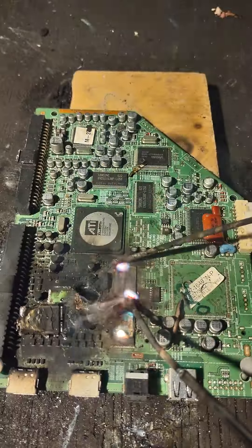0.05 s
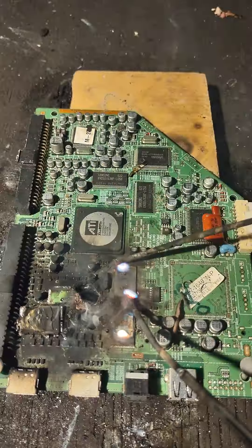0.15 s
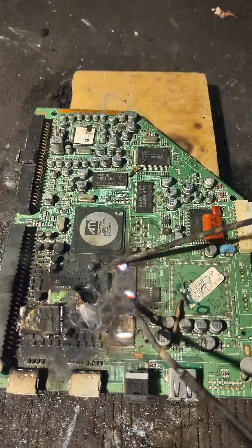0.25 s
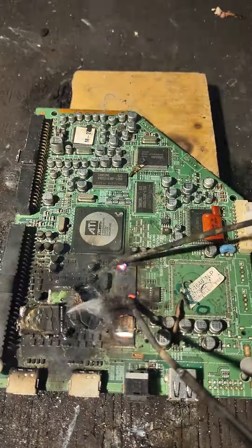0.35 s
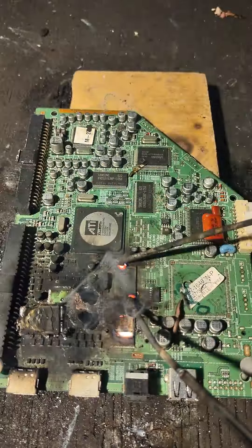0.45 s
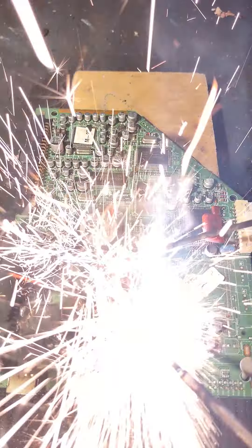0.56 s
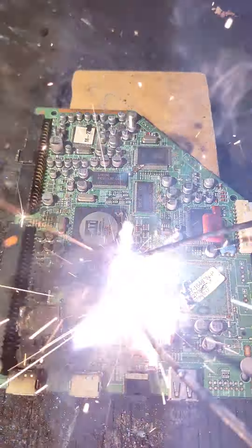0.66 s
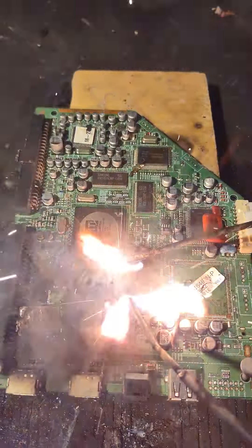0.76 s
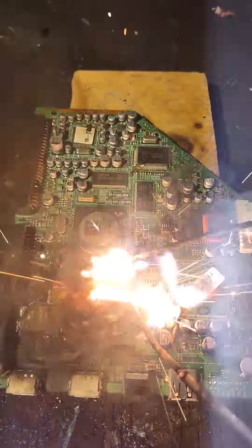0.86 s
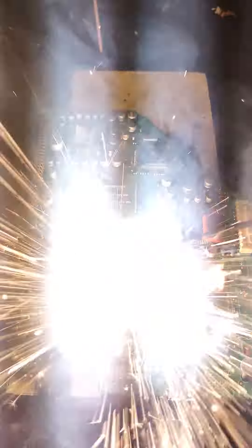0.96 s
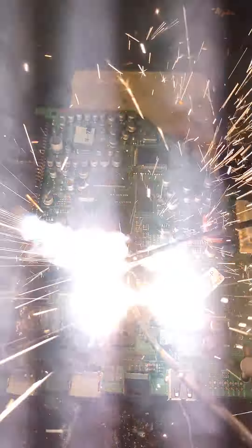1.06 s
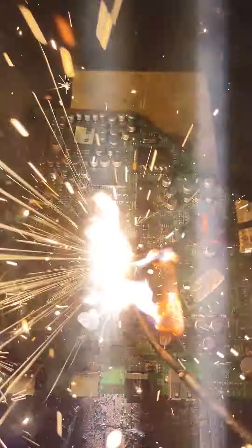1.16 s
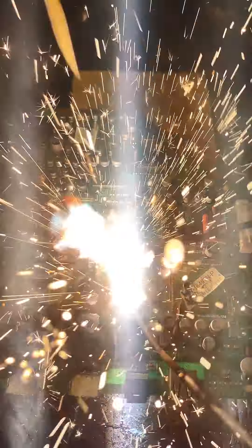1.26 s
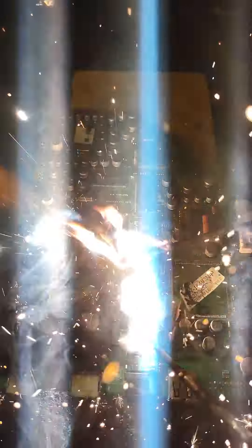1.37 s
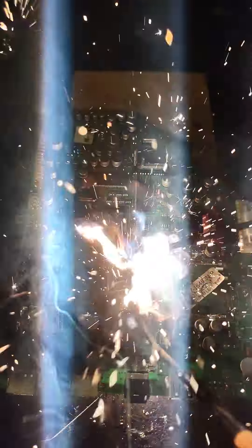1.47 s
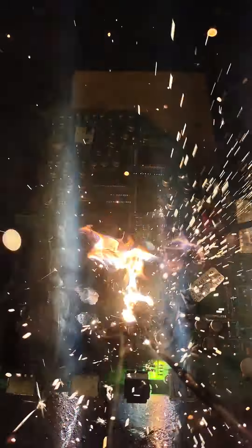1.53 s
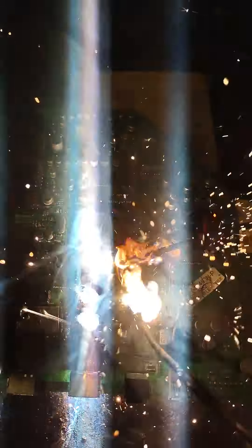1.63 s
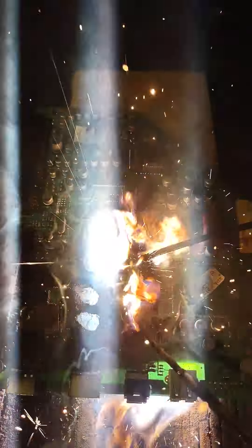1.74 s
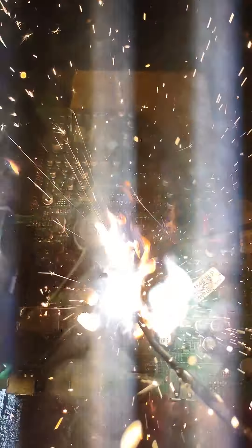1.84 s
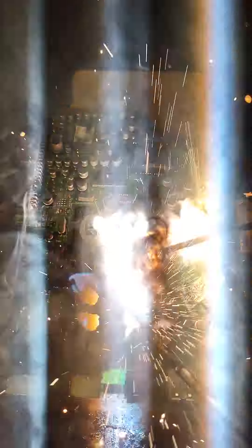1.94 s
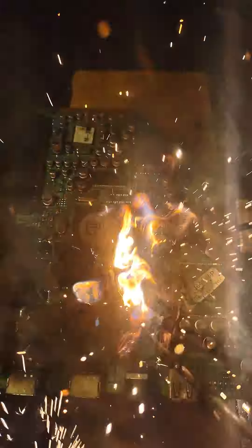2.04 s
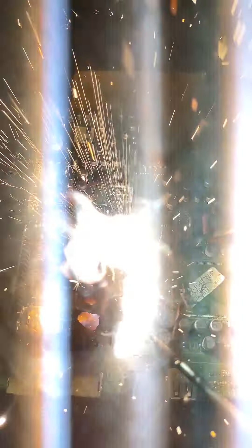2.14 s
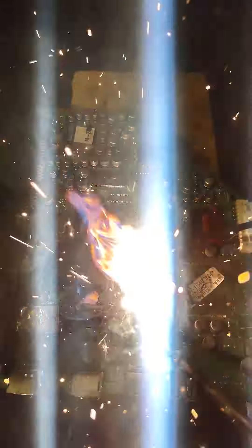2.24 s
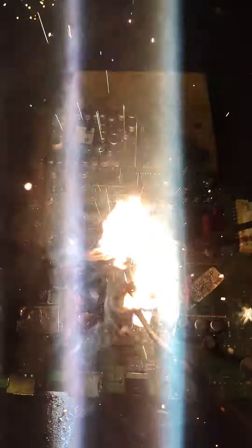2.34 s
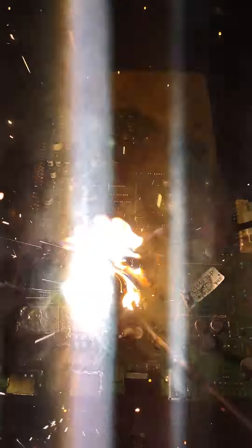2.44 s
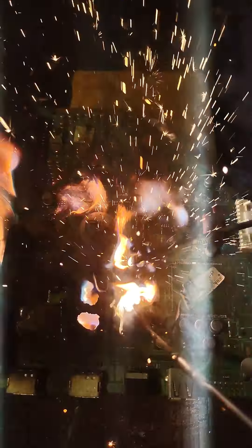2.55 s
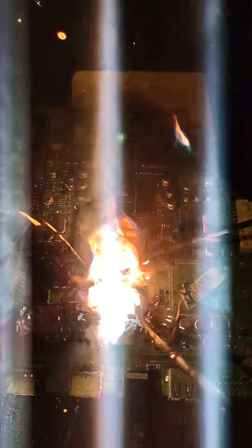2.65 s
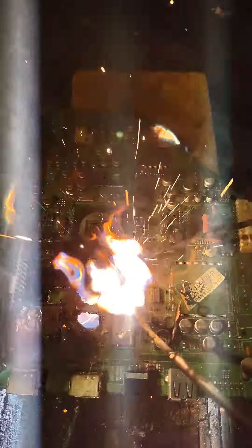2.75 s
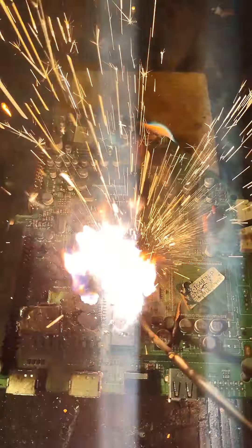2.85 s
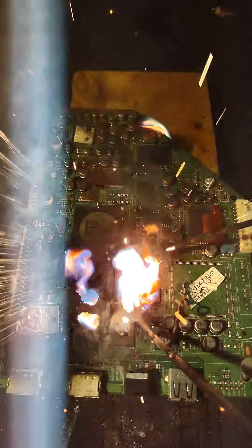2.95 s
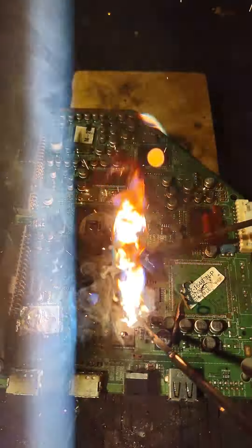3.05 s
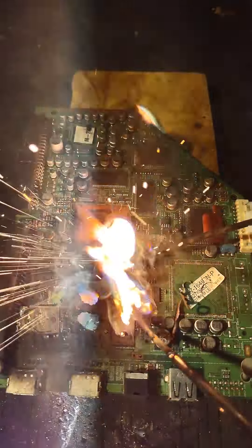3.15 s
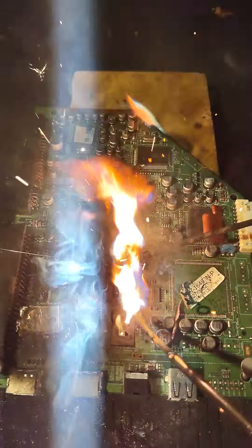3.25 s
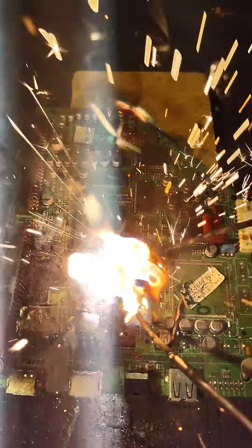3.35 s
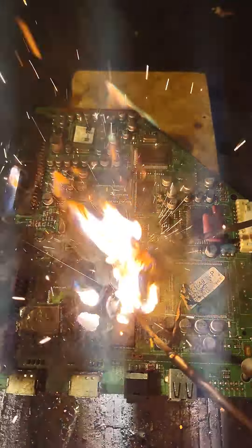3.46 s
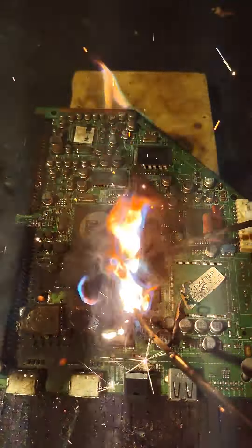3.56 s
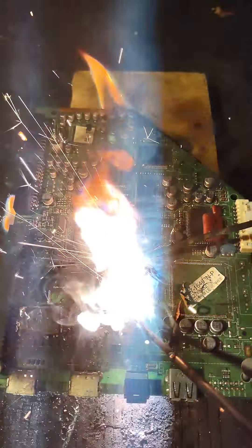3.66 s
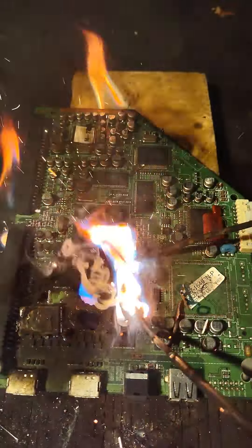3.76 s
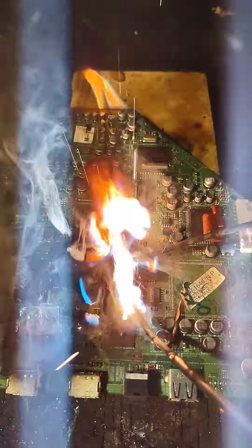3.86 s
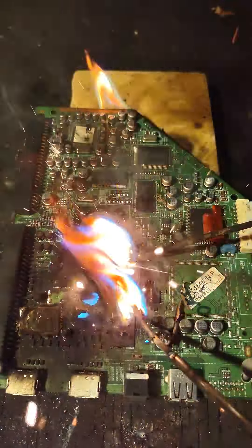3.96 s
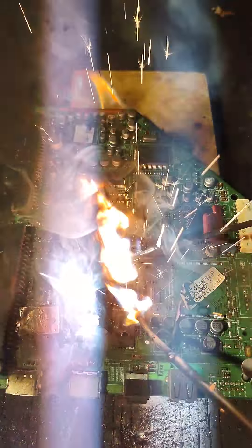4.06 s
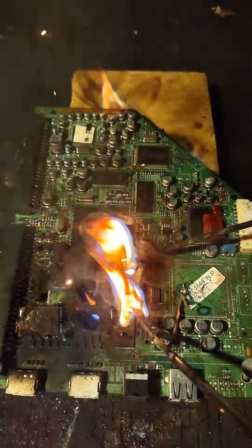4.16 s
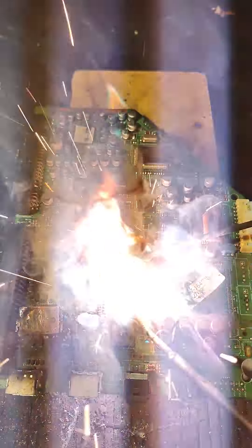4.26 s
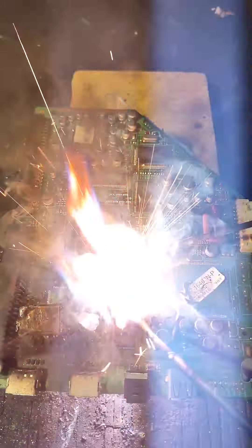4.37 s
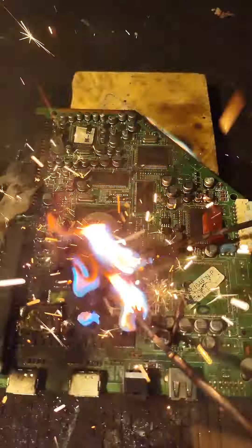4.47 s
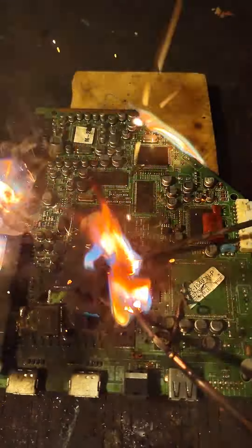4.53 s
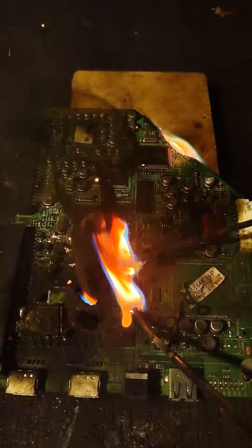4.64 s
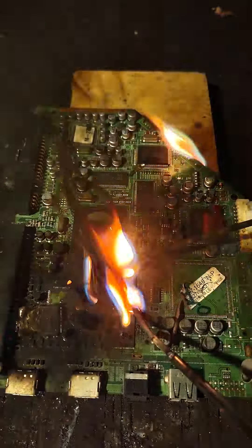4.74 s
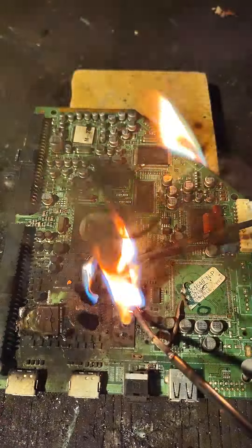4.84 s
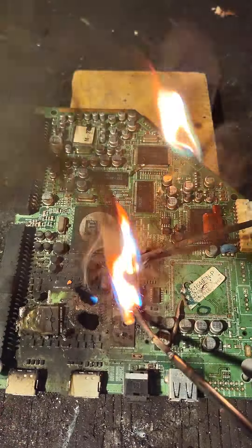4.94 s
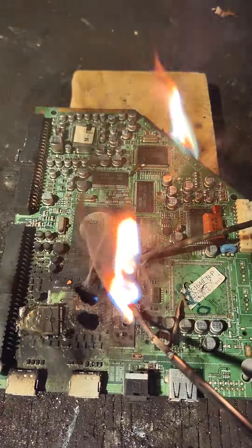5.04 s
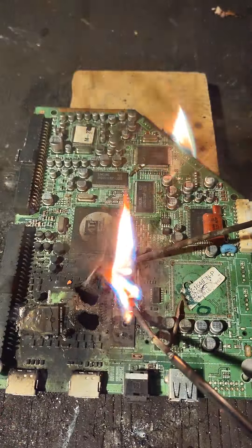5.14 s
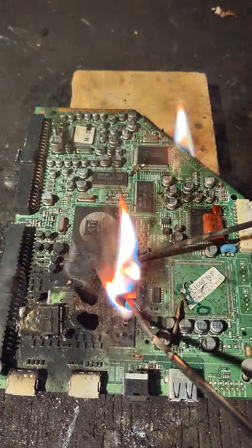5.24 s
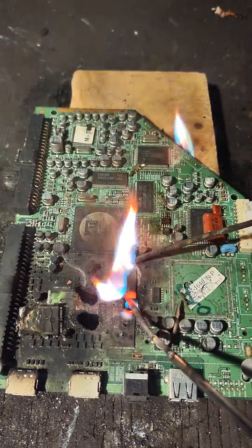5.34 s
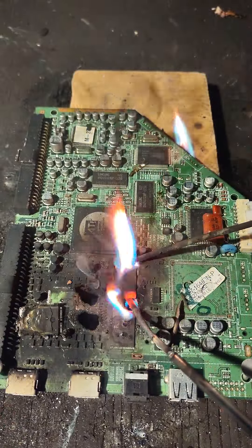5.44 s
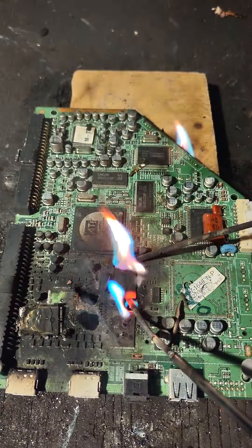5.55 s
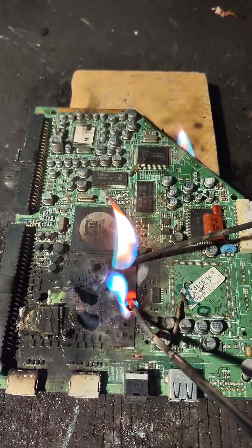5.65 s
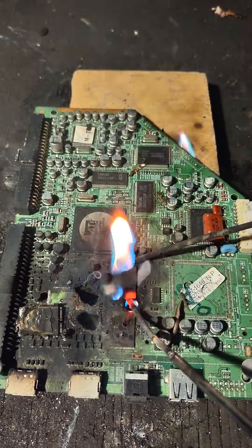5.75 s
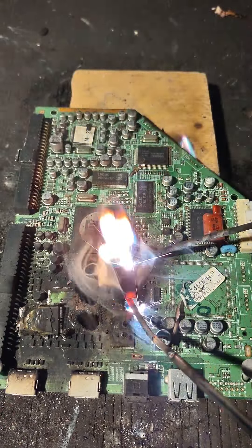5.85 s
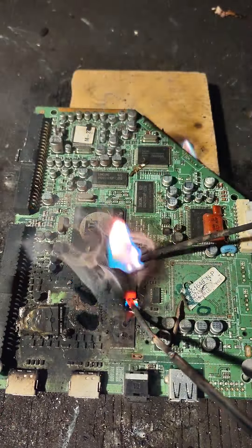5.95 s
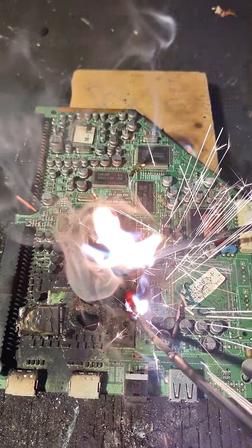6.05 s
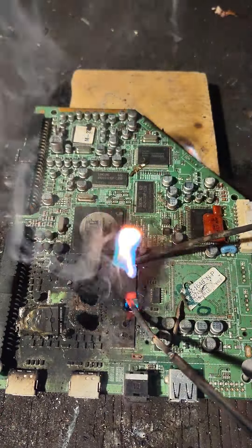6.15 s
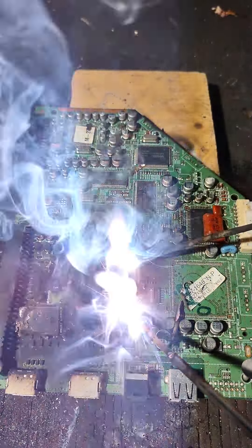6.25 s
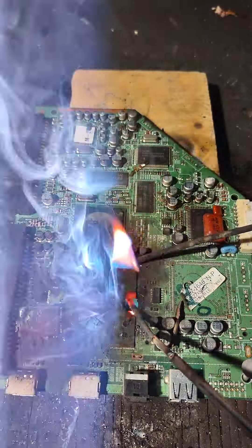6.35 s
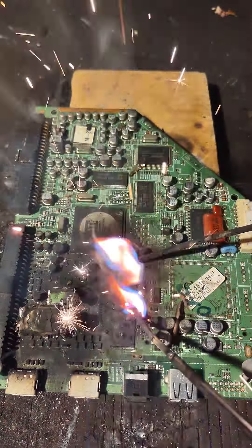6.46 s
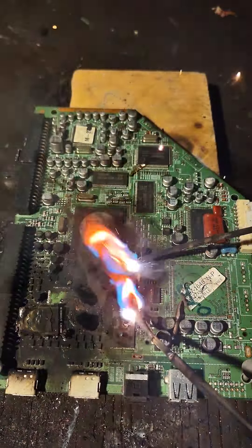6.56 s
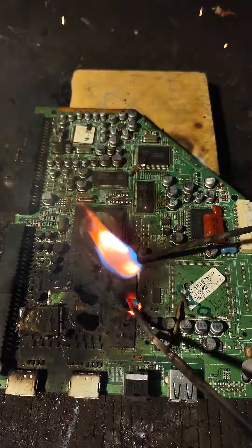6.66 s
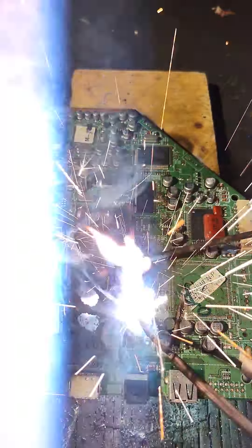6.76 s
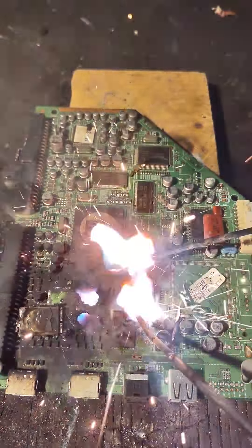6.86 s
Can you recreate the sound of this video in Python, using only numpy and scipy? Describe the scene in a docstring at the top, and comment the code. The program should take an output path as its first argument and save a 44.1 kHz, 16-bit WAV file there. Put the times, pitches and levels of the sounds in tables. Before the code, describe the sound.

Close, sharp electrical pops and sizzling crackle over a low hum, followed by a lull and a few more snaps.

```python
"""Arc on a burning circuit board

A mains-fed arc jumps between two probes, close to the microphone in a workshop. It can strike once
in every half wave: each strike is a pressure pop and a burst of spatter. The plasma hums at twice
the mains frequency, molten bits sizzle, the hot board ticks, the room answers and rumbles faintly."""
import sys
import numpy as np
from scipy import signal
from scipy.fft import rfft, irfft, next_fast_len
from scipy.io import wavfile
from scipy.ndimage import uniform_filter1d, map_coordinates

SR = 44100
rng = np.random.default_rng(int(sys.argv[2]) if len(sys.argv) > 2 else 0)


def file_out(sig):
    """Save sig as 16-bit WAV at sys.argv[1]."""
    # one column per channel
    cols = np.atleast_2d(sig).T
    # limit, then scale
    lim = np.clip(cols, -1, 1)
    pcm = np.round(lim * 32767).astype(np.int16)
    wavfile.write(sys.argv[1], SR, pcm)


N = 304290
TIME = np.arange(N) / SR
MAINS_HZ, FIRST_CREST_S = 59.96, .0055

# Accents, the big hits and re-ignitions: t/s, spatter level/dB, pop level/dB
ACCENTS = [(0.1, -31.5, -26.5), (0.1414, -29.5, -17), (0.631, -12, -9), (0.656, -11, -10.5),
           (0.6735, -11.5, -6), (0.7387, -16, -12.5), (0.7573, -13.5, -8.5), (0.822, -15.5, -10.5),
           (0.9085, -20.5, -9), (0.9163, -14.5, -9.5), (0.9587, -22, -7.5), (1.006, -16.5, -11.5),
           (1.0148, -13, -23), (1.0577, -26, -13.5), (1.074, -11, -5.5), (1.0897, -9, -17.5),
           (1.105, -12, -9.5), (1.198, -16.5, -16), (1.2419, -11.5, -7.5), (1.2586, -12.5, -8),
           (1.2915, -14.5, -7.5), (1.3143, -14, -6.5), (1.326, -7.5, -13.5), (1.3483, -9, -7),
           (1.3649, -11, -9.5), (1.3808, -9, -16.5), (1.423, -8.5, -11.5), (1.4967, -17.5, -14),
           (1.5578, -10.5, -5.5), (1.618, -9.5, -18.5), (1.6991, -11.5, -8.5), (1.7225, -10, -6),
           (1.766, -11.5, -7), (1.783, -8.5, -9.5), (1.873, -13, -7), (1.932, -15, -9), (1.9829, -16, -9),
           (2.009, -22, -12), (2.033, -15, -9), (2.0515, -13, -13), (2.109, -15.5, -13.5),
           (2.158, -11.5, -13), (2.1922, -13, -8.5), (2.2405, -11, -12), (2.274, -14.5, -10.5),
           (2.2989, -11.5, -7.5), (2.358, -22.5, -8.5), (2.4489, -13, -6.5), (2.4825, -14.5, -14),
           (2.5168, -26.5, -9), (2.5509, -11.5, -6), (2.6063, -8.5, -7.5), (2.6573, -15, -17),
           (2.7171, -17, -17.5), (2.7655, -12, -11), (2.8327, -14.5, -9), (2.8836, -17.5, -12.5),
           (2.9099, -19, -10.5), (2.9421, -13, -13), (2.9575, -11, -7), (3.0258, -16, -10.5),
           (3.0413, -11.5, -9.5), (3.0581, -12, -14.5), (3.083, -11, -11.5), (3.1086, -16, -8.5),
           (3.183, -16.5, -9), (3.191, -13, -10), (3.208, -12, -9.5), (3.2253, -12.5, -9.5),
           (3.2421, -11.5, -10.5), (3.284, -8.5, -6), (3.326, -14.5, -13), (3.3591, -14.5, -9),
           (3.3841, -12.5, -9.5), (3.4173, -14, -8), (3.4434, -13.5, -7.5), (3.4584, -11, -8),
           (3.492, -7.5, -10.5), (3.534, -15, -11), (3.5585, -12, -8.5), (3.5924, -14.5, -21),
           (3.6676, -27, -10.5), (3.6924, -17, -7), (3.7238, -7, -8), (3.7933, -18.5, -10),
           (3.8337, -10, -10), (3.878, -27, -16.5), (3.9507, -15.5, -4.5), (3.9674, -11, -3.5),
           (3.9753, -18.5, -8), (3.9922, -18, -6), (4.0163, -9, -10), (4.0333, -16, -12), (4.042, -24, -10),
           (4.1673, -16, -8.5), (4.175, -12.5, -7), (4.3257, -22.5, -2), (4.334, -9, -16), (4.3502, -12, 4),
           (4.3921, -16.5, -9), (4.4089, -10, -8), (4.426, -25, -10), (4.4427, -22.5, -12.5),
           (4.4842, -16.5, -10), (4.5246, -13, -10), (4.5415, -13.5, -3.5), (4.5584, -15.5, -11.5),
           (5.967, -32.5, -28), (6.1596, -17, -5), (6.167, -22.5, -15.5), (6.3853, -22.5, -6.5),
           (6.485, -21.5, -9.5), (6.4926, -11, -5), (6.5004, -16, -7.5), (6.51, -10, -10.5),
           (6.5262, -14.5, -9), (6.634, -31, -19.5), (6.6602, -31, -17), (6.843, -15, -4.5),
           (6.8591, -11, -5.5)]
# Fader moves of the burning arc: t/s, sizzle level/dB, hum level/dB, fill pop/dB, fill spatter/dB
ARC_FADERS = [(.628, -21.5, -41.5, -22.5, -18), (.9, -35.5, -31.5, -16, -26),
              (1.1, -28.5, -26.5, -18.5, -23), (1.5, -22, -31, -13.5, -16.5), (1.97, -21, -27, -16, -18.5),
              (2.5, -18.5, -37, -13, -25), (2.7, -35, -47, -16.5, -18), (3.3, -31.5, -46.5, -14, -21),
              (3.8, -40, -41, -15, -20), (4, -42.5, -34.5, -16, -19), (4.15, -46.5, -28.5, -21.5, -32.5),
              (4.33, -41, -25, -9.5, -23), (4.55, -23.5, -34, -15.5, -19), (4.7, -45, -39, -18.5, -22.5),
              (4.84, -71.5, -50.5, -20, -22), (6.14, -70.5, -50, -20, -25), (6.17, -49.5, -49.5, -23, -27),
              (6.45, -65.5, -50, -18, -21), (6.5, -33, -37, -15.5, -27), (6.7, -49, -40, -19, -20),
              (6.82, -63, -35, -21, -21), (6.845, -27.5, -43, -7, -13), (6.9, -32.5, -41.5, -21.5, -18)]
# Thin ticks of the hot board and the arc's last small sputters: t/s, level/dB
THIN_TICKS = [(0.022, -34), (0.057, -38), (4.225, -24.5), (4.293, -24), (4.648, -23.5), (4.706, -30.5),
              (4.748, -34.5), (4.769, -38), (4.803, -42), (4.831, -40.5), (4.903, -54.5), (4.959, -65.5),
              (4.979, -52.5), (5.12, -50), (5.135, -45.5), (5.144, -40.5), (5.154, -44.5), (5.298, -59),
              (5.457, -54.5), (5.518, -31.5), (5.67, -33), (5.76, -54), (5.847, -44), (6.051, -49.5),
              (6.377, -23)]
def strikes():
    """Accents, random-sized fills on the other mains crests while the arc burns, and thin ticks and sputters."""
    accent_s, spatter_db, pop_db = np.transpose(ACCENTS)
    crests = np.arange(FIRST_CREST_S, N / SR, .5 / MAINS_HZ)
    at = (crests * SR).astype(int)
    size, jitter, spread = rng.standard_normal((len(crests), 3)).T
    accented = np.abs(crests[:, None] - accent_s).min(axis=1) < .004
    free = ~accented & (burning()[at] > 0)
    spent_db = 3.5 * np.roll(accented, 1)  # an accent leaves the gap weaker for the next half wave
    size_db = np.minimum(3.5 * size, 1.5) - spent_db
    fill_pop_db, fill_spatter_db = (fader[at] + size_db for fader in faders(ARC_FADERS)[2:])
    fills = np.array([crests + .0008 * jitter, fill_spatter_db + 2.5 * spread, fill_pop_db])[:, free]
    tick_s, tick_db = np.transpose(THIN_TICKS)
    hits = np.hstack([[accent_s, spatter_db, pop_db], fills, [tick_s, tick_db - 12.5, tick_db - .5]])
    counts = [len(accent_s), free.sum(), len(tick_s)]
    return discharge(*hits, base_rise_s=np.repeat([.00021, .00022, .00005], counts),
                     base_t60=np.repeat([.032, .03, .03], counts))


# Softness of the pops, longer is duller: t/s, length/ratio
POP_STRETCH = [(0, 0.78), (.7, 1.24), (.95, 1.73), (1.3, 0.98), (3.8, 0.96), (4.3, 0.91), (6.9, 0.66)]
# Tone of spatter and sizzle: f/Hz, level/dB
SPATTER_EQ = [(710, -15), (1200, -2.5), (1440, -18.5), (1830, -2.5), (2560, -7), (2950, -2.5), (5900, -4.5),
              (9720, -14), (15200, -17), (16000, -23.5)]
def discharge(times, spatter_db, pop_db, base_rise_s, base_t60):
    """Each strike shoves the air once and throws a short, ragged spray of spatter."""
    t = np.arange(SR // 25) / SR
    length, decay, echo_strength, delay = rng.standard_normal((len(times), 4)).T
    starts = times - base_rise_s
    blunt = .0083 * (pop_db - spatter_db - 5.5)  # little spatter means a slower, duller shove
    rise_s = base_rise_s * np.interp(times, *np.transpose(POP_STRETCH)) * np.exp(blunt + .14 * length)
    age = t[:120] / rise_s[:, None]
    shove = amp(pop_db)[:, None] * (age * np.exp(1 - age)) ** 2
    echo_s = times + .001301 * np.exp(.098 * delay)  # an inverted echo of each pop, about 1.3 ms later
    pops = place(starts, shove) + place(echo_s, (.3 * echo_strength[:, None] - .75) * shove)
    t60 = (base_t60 * np.exp(.46 * decay))[:, None]
    spray_power = (1 - np.exp(-t / .00062)) ** 2 * amp(2 * spatter_db[:, None] - 120 * t / t60)
    spray = np.sqrt(place(starts, spray_power)) * amp(.89 * wobble(700))
    return amp(1) * filtered(pops, air_pocket) + amp(3.5) * spray * hiss(SPATTER_EQ)


# Body of the pops: f/Hz, bandwidth/Hz, left level/dB, right level/dB
POCKET_MODES = [(161.4, 102, 2.5, 4), (241.6, 42, -0.5, -0.5), (499, 209, -7.5, 5), (947, 1140, 1, 3.5),
                (2049, 645, 7, 3), (3600, 770, -15.5, -25)]
def air_pocket(hz):
    """Response of the air ringing between board, bench and microphone; the left port is nearer."""
    ring = sum(amp([[left], [right]]) * 1j * hz * width / (f * f - hz * hz + 1j * hz * width)
               for f, width, left, right in POCKET_MODES)
    left_lead_s = .00007
    return ring * np.exp(2j * np.pi * hz * np.array([[.5], [-.5]]) * left_lead_s)


# Gaps in the burn: start t/s, end t/s
ARC_GAPS = [(0, .63), (.685, .738), (.785, .82), (.85, .905), (.935, .955), (.98, 1.004), (1.025, 1.055),
            (1.168, 1.18), (1.295, 1.306), (1.402, 1.42), (1.468, 1.488), (1.68, 1.696), (1.99, 2.03),
            (2.088, 2.105), (2.165, 2.18), (2.22, 2.23), (2.505, 2.53), (2.64, 2.654), (2.725, 2.764),
            (2.805, 2.83), (2.985, 3.022), (3.062, 3.106), (3.14, 3.182), (3.255, 3.28), (3.33, 3.38),
            (3.395, 3.44), (3.465, 3.48), (3.505, 3.555), (3.625, 3.666), (3.705, 3.722), (3.812, 3.83),
            (3.85, 3.948), (3.98, 3.99), (4.05, 4.165), (4.198, 4.315), (4.465, 4.475), (4.5, 4.522),
            (4.565, 6.48), (6.535, 6.84)]
def burning():
    """1 while the arc burns, 0 while it is out."""
    return 1 - sum((TIME > start) & (TIME < end) for start, end in ARC_GAPS)


# Partials of the hum: multiple of twice the mains frequency, level/dB
HUM_PARTIALS = [(1, 2), (2, -5), (4, -4), (5, -15)]
def plasma():
    """The hot column swells with each half wave; molten bits sizzle, less when the arc is out."""
    sizzle_db, hum_db = faders(ARC_FADERS)[:2]
    heat = uniform_filter1d(burning() * 1.0, size=500)
    phase = 4 * np.pi * MAINS_HZ * (TIME - FIRST_CREST_S)
    # the hum lags the strikes by about 4 ms, keeping its low note full
    lagged = phase - 4 * np.pi * MAINS_HZ * .0042
    hum = sum(amp(db + 2.5 * wobble(40)) * np.cos(k * lagged + .3 * wobble(30)) for k, db in HUM_PARTIALS)
    spits_db = 4.9 * wobble(60) + 2.1 * wobble(500) + 2.8 * np.cos(phase - 1.2)
    sizzle = amp(sizzle_db - 4.3 * (1.5 - heat) + spits_db) * hiss(SPATTER_EQ)
    return amp(hum_db) * heat * hum + sizzle


# Reverb time of the room: f/Hz, t60/s
ROOM_DECAY = [(100, 0.3), (400, 0.63), (1500, .55), (3500, 0.27), (14000, 0.16)]
def workshop(x):
    """A short room reverb in which each frequency dies at its own speed."""
    hz, t, noise = signal.stft(rng.standard_normal((2, SR // 2)), SR, nperseg=256)
    tail = signal.istft(noise * amp(-60 * t / along(ROOM_DECAY, hz)[:, None]), SR, nperseg=256)[1]
    predelayed = np.pad(x.mean(axis=0), (200, 0))[None]
    reverb = signal.fftconvolve(predelayed, tail / np.linalg.norm(tail[0]), axes=1)[:, :N]
    return_eq = [(70, 1), (120, 3.5), (250, -3), (480, -4), (1000, -9), (2000, -4), (10000, 5)]
    return stereo_pair(reverb, return_eq)


# Fader moves of the bed: t/s, rumble level/dB, air level/dB
BED_FADERS = [(0, -48.5, -58.5), (.25, -55, -59.5), (.45, -45.5, -58.5), (.6, -55, -63), (.64, -40.5, -57),
              (4.7, -44.5, -50), (4.85, -60, -69), (5.3, -62.5, -71.5), (5.92, -71.5, -77), (6.1, -71, -66),
              (6.9, -63.5, -67.5)]
# Tone of the rumble: f/Hz, level/dB
RUMBLE_EQ = [(18, -41), (30, -13.5), (81, 3), (140, -2), (231, -1.5), (289, -10.5), (700, -28), (910, -54),
             (1540, -120)]
# Tone of the airy hiss: f/Hz, level/dB
AIR_EQ = [(240, -30.5), (400, -2.5), (1000, -2.5), (2200, -10.5), (2800, -18), (6500, -26.5),
          (12000, -26.5), (15500, -28.5)]
# Low swell before the arc catches: t/s, level/dB
DRONE_FADER = [(.3, -75), (.33, -47), (.48, -56), (.53, -80)]
def room_tone():
    """A low, lumpy rumble of flame and room, a faint airy hiss and a short drone."""
    rumble_db, air_db = faders(BED_FADERS)
    drone_hz = 155
    drone = amp(faders(DRONE_FADER)[0] + 1.5 * wobble(30)) * np.sin(2 * np.pi * drone_hz * TIME)
    rumble = amp(rumble_db + .67 * wobble(25)) * hiss(RUMBLE_EQ)
    air = amp(air_db + 1.05 * wobble(55)) * hiss(AIR_EQ)
    return rumble + air + drone


# Pan of the noise layers: f/Hz, left minus right level/dB
NOISE_PAN = [(600, 0.5), (2000, -1), (5000, -3), (8000, -7), (14000, 2.5)]
def hiss(eq):
    """Coloured stereo noise of rms 1."""
    pair = stereo_pair(rng.standard_normal((2, N)), eq)
    panned = filtered(pair, lambda hz: amp(along(NOISE_PAN, hz) * [[.5], [-.5]]))
    return panned / np.sqrt(np.mean(panned ** 2) + 1e-20)


# Stereo image, mono in the bass and wide on top: f/Hz, left-right correlation
CORRELATION = [(100, 1), (500, 0.61), (1500, 0.35), (4000, 0.068), (12000, 0.012)]
def stereo_pair(x, eq):
    """Colours two unrelated signals and blends them as two close microphone ports hear them."""
    def mid_side(hz):
        angle = np.arccos(np.clip(along(CORRELATION, hz), -1, 1)) / 2
        return amp(along(eq, hz)) * [np.cos(angle), np.sin(angle)]
    mid, side = filtered(x, mid_side)
    return np.array([mid + side, mid - side])


def amp(db):
    """Decibels to gain."""
    return 10 ** (np.asarray(db) / 20)


def along(points, hz):
    """Reads (f/Hz, value) points on a log frequency axis."""
    f, values = np.transpose(points)
    return np.interp(np.log(hz + 1), np.log(f + 1), values)


def faders(rows):
    """One dB curve for each column after the time; silent outside the rows."""
    times, *columns = np.transpose(rows)
    return [np.interp(TIME, times, db, left=-120, right=-120) for db in columns]


def wobble(rate):
    """A smooth random curve, rate knots a second."""
    return map_coordinates(rng.standard_normal(int(N * rate / SR) + 4), [TIME * rate])


def filtered(x, response):
    """x through a complex frequency response."""
    size = next_fast_len(N + SR // 2)
    return irfft(rfft(x, size) * response(np.fft.rfftfreq(size, 1 / SR)), size)[..., :N]


def place(times, shapes):
    """Lays one short shape on the track at each time."""
    at = np.round(times * SR).astype(int)[:, None] + np.arange(shapes.shape[1])
    return np.bincount(at.ravel(), shapes.ravel(), N + shapes.shape[1])[:N]


def scene():
    """Close strikes, their reverb, plasma and bed; a noise suppressor ducks the quiet reverb tails."""
    close = strikes()
    reverb = amp(-9) * workshop(close)
    level_db = 10 * np.log10(np.abs(uniform_filter1d((close + reverb)[0] ** 2, size=900)) + 1e-12)
    threshold_db, range_db = -44.5, 12
    gate = amp(-np.clip(.71 * (threshold_db - level_db), 0, range_db))
    return close + gate * reverb + plasma() + room_tone()


def record(dry):
    """The microphone drops the deep bass, rounds off the highest peaks and ends at its band limit."""
    low_cut_hz, width_hz, ceiling, top_hz = 105, 110, .95, 15900
    thin = filtered(dry, lambda hz: -hz * hz / (low_cut_hz ** 2 - hz * hz + 1j * hz * width_hz))
    soft = thin / (1 + np.abs(thin / ceiling) ** 4) ** (1 / 4)
    return filtered(soft, lambda hz: hz < top_hz)


dry = scene()
out = record(dry)
file_out(out)
```